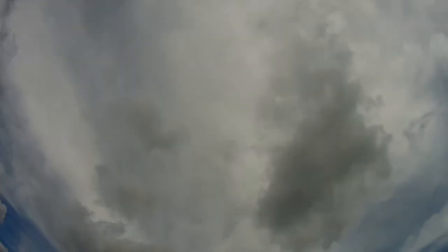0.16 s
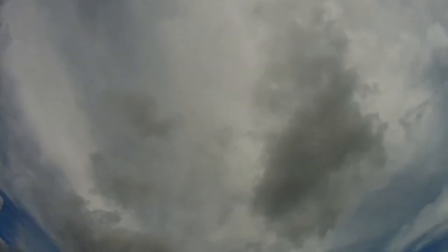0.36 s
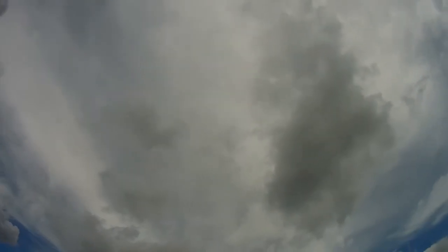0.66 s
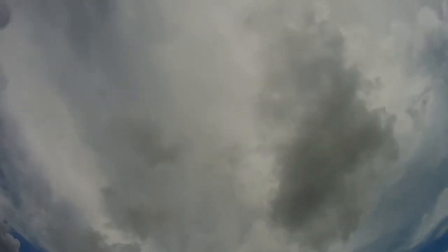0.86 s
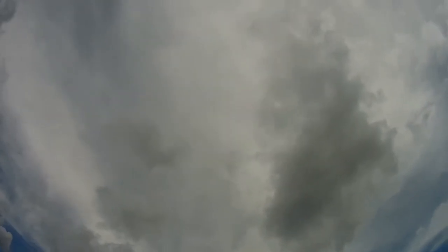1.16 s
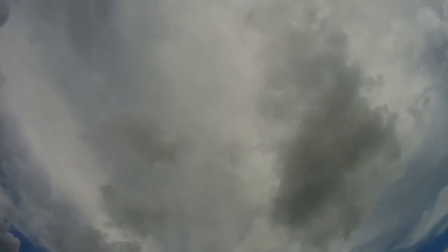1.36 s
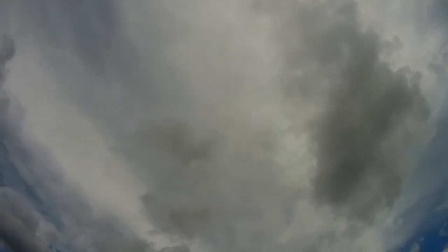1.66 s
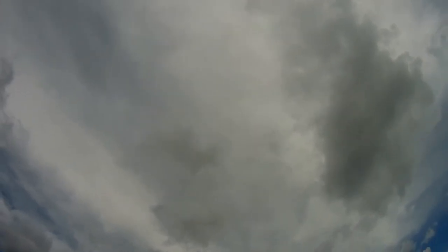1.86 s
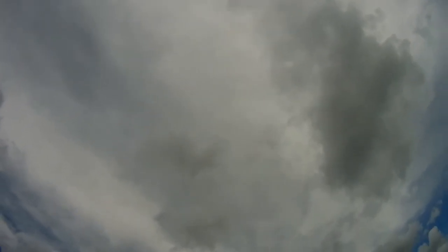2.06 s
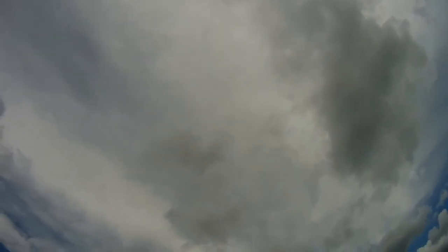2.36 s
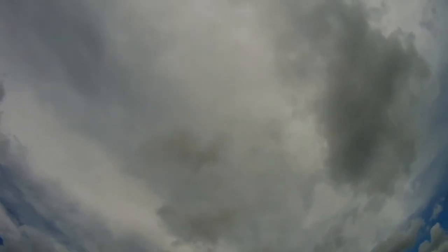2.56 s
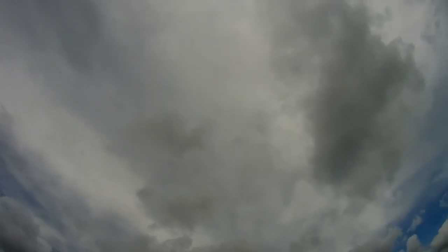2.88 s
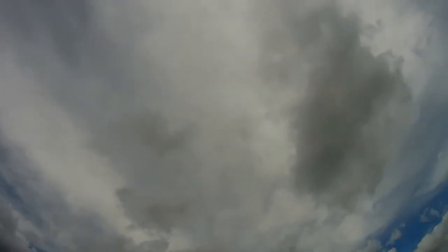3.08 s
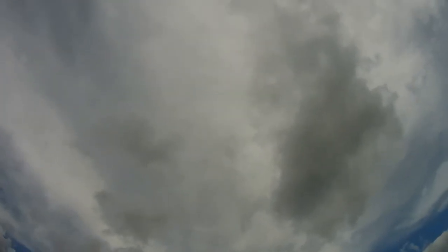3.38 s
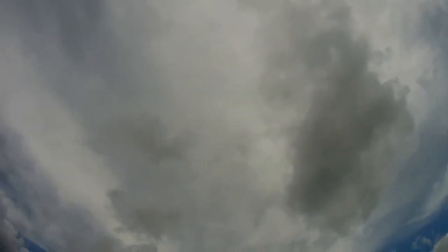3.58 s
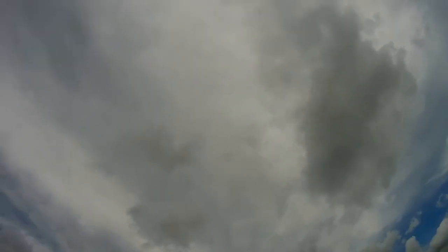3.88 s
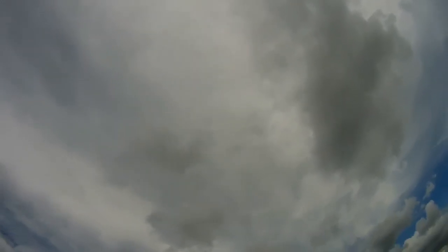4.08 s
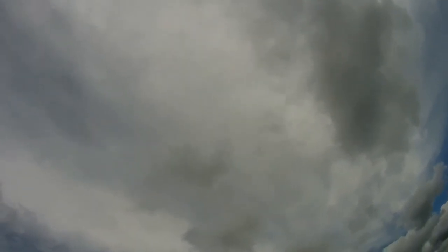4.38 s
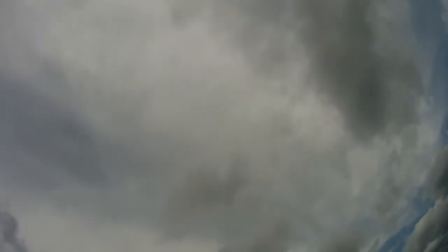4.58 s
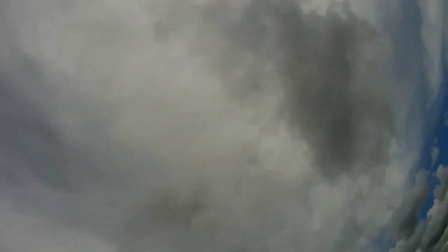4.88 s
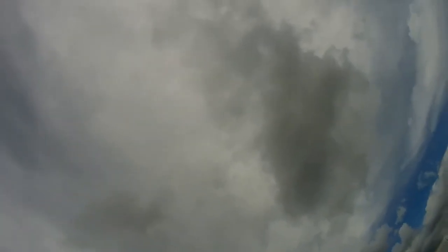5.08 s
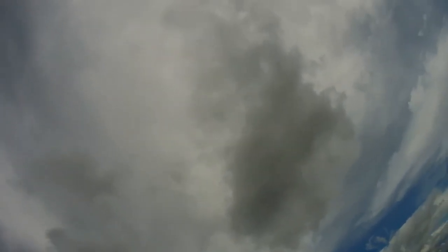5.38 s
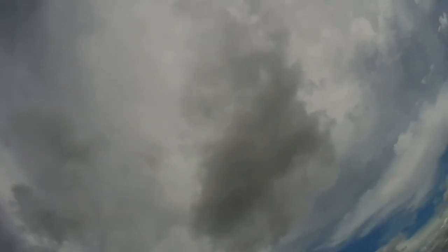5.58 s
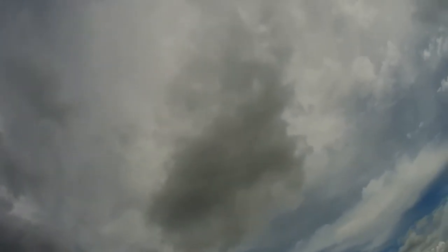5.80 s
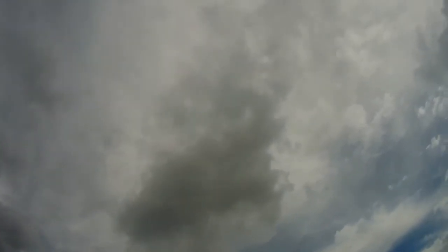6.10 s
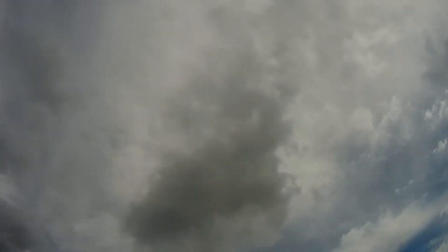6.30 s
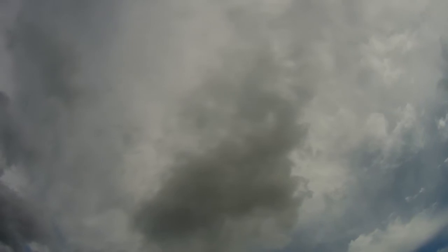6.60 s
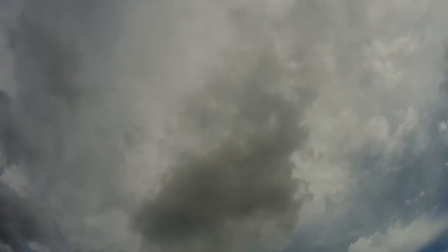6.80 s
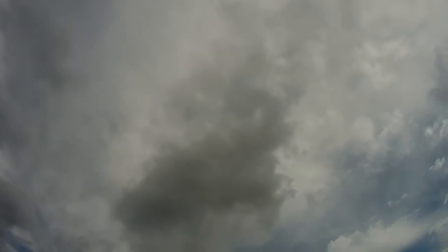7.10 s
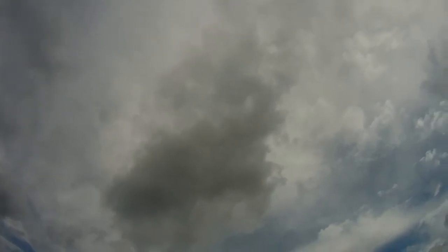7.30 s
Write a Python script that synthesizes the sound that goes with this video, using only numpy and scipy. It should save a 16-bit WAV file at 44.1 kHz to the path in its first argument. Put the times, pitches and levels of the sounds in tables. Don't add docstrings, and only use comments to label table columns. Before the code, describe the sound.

From 0 to about 6 seconds, a microphone fixed to a small climbing drone picks up a loud, nasal rotor whine rich in harmonics, shaking through the frame. Its pitch sinks almost imperceptibly as the battery sags. Around it are low rumbling prop wash, hiss pulsing with the blades, a slowly worsening fine rattle and a thin steady high electronic tone. The airflow is strongest near 1 second, then eases. At about 6.04 power is cut and the whine drops steeply in a fifth of a second. Between 6.15 and 6.4 the stalling motor gives tiny sharp clicks, a faint very high falling whistle and a final hard knock. Free air rushes in as a low, buffeting roar, strongest around 6.3 to 6.8, then fades as the climb slows. By 7 seconds a rapid, dry servo tick, fifty a second, stands out as a faint buzz until the end. Slightly compressed sound, open air, no echo.

```python
import sys
import numpy as np
from scipy import signal
from scipy.fft import rfft, irfft, next_fast_len
from scipy.io import wavfile
from scipy.ndimage import uniform_filter1d

SR = 44100
rng = np.random.default_rng(int(sys.argv[2]) if len(sys.argv) > 2 else 0)


def to_wav(sig):
    pcm = np.clip(np.atleast_2d(sig), -1, 1) * 32767
    pcm = np.round(pcm).astype(np.int16)
    wavfile.write(sys.argv[1], SR, pcm.T)


def field_ratio(decibels):
    return 10 ** (np.asarray(decibels, dtype=float) / 20)


N = 328545
TIME = np.arange(N) / SR
CUT_S, STALL_S = 6.0425, 6.254

# [s, Hz]
CLIMB = [(0.06, 368.1), (0.35, 366.6), (0.68, 363.7), (0.75, 361.7), (0.8, 362.6), (0.9, 361.2),
         (1.08, 361.4), (1.15, 360.0), (1.65, 359.1), (1.9, 357.9), (2.35, 356.1), (2.5, 355.1),
         (3.0, 353.4), (4.0, 350.2), (4.65, 348.0), (4.95, 347.7), (5.1, 346.7), (5.9, 344.4)]
FRAME_MODES = {3: [(1066, 66, -13.8)], 6: [(2163, 68, -22)], 12: [(4316, 30, -33.5), (4226, 6, -37),
               (4190, 16, -36), (4148, 34, -31.5)]}


def after(s):
    return np.maximum(TIME - s, 0)


def curves(rows):
    s, *columns = np.transpose(rows)
    return [np.interp(TIME, s, column) for column in columns]


def walk(rate):
    place = TIME[::16] * rate
    levels = rng.standard_normal(int(place[-1]) + 2)
    k = place.astype(int)
    ease = np.sin(np.pi / 2 * (place - k)) ** 2
    return np.interp(TIME * rate, place, 1.13 * (levels[k] + np.diff(levels)[k] * ease))


def air(tone, anchors_hz, levels_db, swell_db, flicker_db, gate=1):
    size = next_fast_len(N)
    octave = np.log2(np.maximum(np.arange(size // 2 + 1) * SR / size, 1))
    hz, db = np.transpose(tone)
    colour = rfft(rng.standard_normal(size)) * field_ratio(np.interp(octave, np.log2(hz), db))
    out, swell = 0, swell_db * walk(18)
    for centre in np.arange(4.5, 14.5, .5):
        window = np.cos(np.pi * np.clip(octave - centre, -.5, .5)) ** 2
        band = irfft(colour * window, size)[:N]
        place = np.interp(centre, np.log2(anchors_hz), np.arange(len(anchors_hz)))
        level = sum(max(1 - abs(place - k), 0) * curve for k, curve in enumerate(levels_db))
        treble = np.clip(centre - 11.5, 0, 1)
        gain = field_ratio(level + treble * swell + flicker_db * walk(14))
        out = out + band * gain * (1 + treble * (gate - 1))
    return out


def blip(db, hz, ms):
    t = np.arange(-200, 201) / SR
    return field_ratio(db) * np.exp(-.5 * (t * 1000 / ms) ** 2) * np.cos(2 * np.pi * hz * t)


def strike(seconds, gain, shape):
    pulses = np.zeros(N)
    pulses[(np.asarray(seconds) * SR).astype(int)] = gain
    return signal.oaconvolve(pulses, shape, "same")


def shaft():
    drag_s_per_s = 0.0142
    hz = 1 / (1 / curves(CLIMB)[0] + drag_s_per_s * after(CUT_S))
    hz = uniform_filter1d(hz, size=800) + 0.234 * walk(40)
    return hz, 2 * np.pi * np.cumsum(hz) / SR


def frame(k, hz):
    power = 0
    for mode_hz, width_hz, db in FRAME_MODES[k]:
        power = power + field_ratio(2 * db) / (1 + ((k * hz - mode_hz) / width_hz) ** 2) ** 2
    return 10 * np.log10(power)


def rotor(hz, angle):
    # [x shaft, dB, dB, dB, dB]
    orders = [(1, -34, -34, -35, -36), (2, -25, -26, -26, -32), (3, -15, -14, -14, -38),
              (4, -37, -44, -46, -40), (5, -50, -42, -39, -42), (6, -29.5, -24.5, -22, -31.5),
              (8, -29, -26, -25, -36), (9, -37, -39, -47, -52), (10, -42, -37, -34, -39),
              (11, -52, -47, -48, -55), (12, -33, -39, -36, -35), (14, -50, -46, -47, -40),
              (15, -56, -55, -53, -56), (16, -52, -53, -49, -45), (18, -41, -43, -46, -49),
              (20, -51, -52, -51, -49), (21, -57, -56, -54, -63), (22, -51, -51, -47, -54),
              (24, -48, -49, -53, -58), (26, -58, -60, -56, -66), (28, -55, -53, -51, -69),
              (30, -54, -54, -55, -64)]
    order_hz = [346.5, 354, 361]
    # [x shaft, Hz, dB]
    humps = [(1, 246, -32), (7, 200, -39), (9, 260, -40.5), (11, 240, -39.5), (18, 1100, -44.5)]
    powered_hz = np.maximum(hz, CLIMB[-1][1])
    trim_db = -60 * np.minimum(after(STALL_S) / .03, 1)
    braking = np.clip((343.5 - hz) / 85, 0, 1)
    out = 0
    for k, *driven_db, brake_db in orders:
        driven = frame(k, powered_hz) if k in FRAME_MODES else np.interp(hz, order_hz, driven_db)
        muffled = 8 * np.clip(k * hz / 1000 - 4.6, 0, 3) * np.clip(4 * braking, 0, 1)
        shake = walk(90)
        wander = min(.08 * k, 1.5) * walk(3) + (min(.08 * k, 1.6) + .9 * braking) * shake
        db = driven + braking * (brake_db - driven) - muffled + trim_db + wander
        slip = rng.uniform(0, 2 * np.pi) + 0.062 * k * walk(1.51) + 0.67 * braking * shake[::-1]
        out = out + field_ratio(db) * np.sqrt(2) * np.cos(k * angle + slip * (k != 3))
    for k, width_hz, db in humps:
        lowpass = signal.butter(2, width_hz / 2, fs=SR, output="sos")
        a, b = signal.sosfilt(lowpass, rng.standard_normal((2, N)))
        smeared = a * np.cos(round(k) * angle) + b * np.sin(round(k) * angle)
        out = out + field_ratio(db - 4.8 * braking + trim_db) / a.std() * smeared
    return out


def wash(angle):
    # [Hz, dB per Hz]
    wash_tone = [(30, -54), (60, -37), (150, -23.5), (400, -25.5), (900, -29), (1600, -34.5), (2600, -41),
                 (4000, -42), (5200, -47.5), (7000, -47.5), (9000, -48.5), (10500, -51.5), (13100, -50.5),
                 (13700, -60), (15000, -70)]
    # [s, dB]
    load_curve = [
        (0, 1),
        (1, 4),
        (1.4, 1.5),
        (1.7, -1),
        (2.5, 0.5),
        (4.6, -0.5),
        (6, -3),
    ]
    # [dB, dB]
    unload_db = [0, 5.5]
    pulse = 0.12 * np.cos(2 * angle) + 0.09 * np.cos(angle + 0.8) - 0.077 * np.cos(3 * angle)
    gate = np.exp(pulse + 0.21 * walk(700))
    load = curves(load_curve)[0]
    idle = np.minimum(after(CUT_S) / 0.22, 1)
    stalled_db = np.minimum(650 * after(6.262), 60)
    rumble_db = 11 + 0.65 * load - unload_db[0] * idle - stalled_db
    hiss_db = 17.7 + 0.95 * load - unload_db[1] * idle - stalled_db
    return air(wash_tone, [250, 5000], [rumble_db, hiss_db], 0.61, 0.75, gate)


def rattle(angle):
    turns = np.flatnonzero(np.diff(angle // (2 * np.pi)))[1:-1]
    chance = rng.standard_normal((len(turns), 2)).T
    level_db = -35.5 + .7 * TIME - 3000 * after(6.138)
    flurry_db = 5 * np.tanh(walk(55))
    db = (level_db + flurry_db)[turns] + 2.5 * chance[0]
    return strike(turns / SR + .00012 * chance[1], field_ratio(db), blip(0, 10180, 0.25))


def switching_tone():
    switching = 7613, -50.5
    hz, db = switching
    tone = field_ratio(db + 1.9 * walk(4.1)) * np.sqrt(2) * np.sin(2 * np.pi * hz * TIME)
    return tone * (TIME < CUT_S)


def servo():
    # [Hz, dB, ms]
    partials = [
        (2271, -35, 0.61),
        (6700, -56, 0.27),
    ]
    # [s, dB]
    opening = [
        (6.5, -4),
        (7.0, -1),
        (7.2, -0.5),
    ]
    pulses_s = np.arange(.0073, N / SR, .02)
    chance = rng.standard_normal((len(pulses_s), 2)).T
    gain = field_ratio(1.1 * chance[1] + np.interp(pulses_s, *np.transpose(opening)))
    tick = sum(blip(db, hz, ms) for hz, db, ms in partials)
    return -strike(pulses_s + .00003 * chance[0], gain, tick)


def rush():
    # [dB, s, s, dB/s, dB/s]
    layers = [
        (-19.5, 6.335, 0.47, 29, 21),
        (-27, 6.72, 0.089, 9.5, 33.5),
        (-44.5, 6.44, 0.33, 12, 31),
    ]
    # [Hz, dB]
    rush_tone = [(25, -42), (60, -16.5), (164, 0), (300, -2.5), (540, -6.5), (900, -10.5), (1300, -11.5),
                 (1950, -26), (2600, -36), (4000, -40.5), (5500, -54), (6500, -45), (9000, -59.5),
                 (12800, -63), (14800, -77)]
    rush_hz = [250, 1210, 4000]
    shielded_db = 46 * np.exp(-after(CUT_S - .03) / 0.077)
    levels_db = []
    for (db, s, hold, rise, fall), lift in zip(layers, [19, 27, 48]):
        swell_db = -rise * np.clip(s - TIME, 0, 1) - fall * after(s + hold)
        levels_db.append(db + lift + swell_db - shielded_db)
    return air(rush_tone, rush_hz, levels_db, 0.76, 1.36)


def stall_clicks():
    # [s, dB, Hz, ms]
    clicks = [
        (6.158, -30, 11000, 0.16),
        (6.207, -23, 8500, .2),
        (6.234, -29, 5500, .2),
        (6.243, -28, 5500, 0.19),
        (6.256, -23, 5000, 0.19),
        (6.270, -27, 6000, .15),
        (6.276, -32, 6000, 0.12),
        (6.3922, -15, 3800, 0.15),
        (6.3922, -27, 8500, 0.13),
        (6.3922, -21, 1900, 0.34),
    ]
    return sum(strike([s], 0.92, blip(*click)) for s, *click in clicks)


def whistle():
    # [s, Hz, dB]
    glide = [
        (6.16, 12900, -65),
        (6.185, 12920, -64),
        (6.258, 12900, -60),
        (6.285, 12700, -52),
        (6.32, 12100, -50),
        (6.366, 11600, -50),
        (6.375, 11600, -85),
    ]
    hz, db = curves(glide)
    phase = 2 * np.pi * np.cumsum(hz + 70 * walk(260)) / SR
    tone = field_ratio(db + 3 * walk(200)) * np.sqrt(2) * np.sin(phase)
    return tone * (TIME > glide[0][0]) * (TIME < glide[-1][0])


def scene():
    hz, angle = shaft()
    powered = rotor(hz, angle) + wash(angle) + rattle(angle) + switching_tone()
    return (powered + servo() + rush() + stall_clicks() + whistle())[None]


def starve(x):
    # [Hz, 0-1]
    holes = [(4400, 0), (4600, .008), (8500, .015), (9200, .04), (10200, .015), (12200, .04), (13300, .08),
             (13700, .25), (15000, .5)]
    hz, s, z = signal.stft(x, SR, nperseg=2048)
    luck = rng.random((len(hz) // 8 + 1, len(s) // 2 + 1))
    luck = luck.repeat(8, 0).repeat(2, 1)[:len(hz), :len(s)]
    shortage = np.exp(.6 * rng.standard_normal(len(s))) * np.clip(s / 1.6, .25, 1) ** 2
    lost = luck < np.outer(np.interp(hz, *np.transpose(holes)), shortage)
    return signal.istft(z * np.where(lost, .08, 1), SR, nperseg=2048)[1][..., :N]


def top_cut(x):
    return signal.sosfilt(signal.butter(12, 15040, fs=SR, output="sos"), x)


def record(dry):
    hiss_band = signal.butter(2, [3000, 13500], "band", fs=SR, output="sos")
    hiss = field_ratio(-66) * signal.sosfilt(hiss_band, rng.standard_normal(N))
    heard = signal.sosfilt(signal.butter(2, 38, "high", fs=SR, output="sos"), dry)
    rounded = 1.095 * np.tanh(1.522 * heard) / 1.535
    mix = starve(rounded + hiss) - .0054
    return top_cut(mix)


dry = scene()
out = record(dry)
to_wav(out)
```